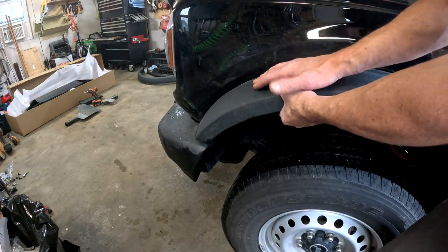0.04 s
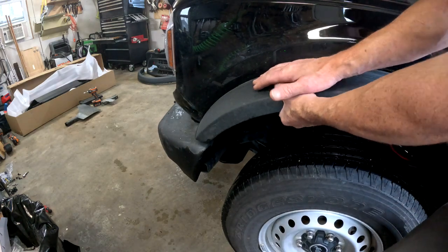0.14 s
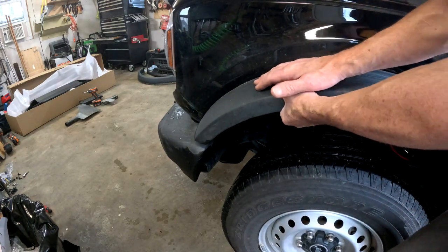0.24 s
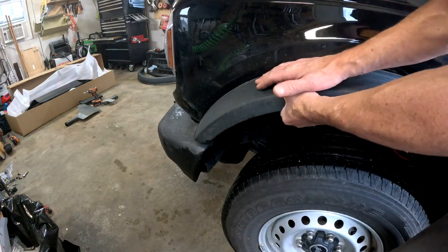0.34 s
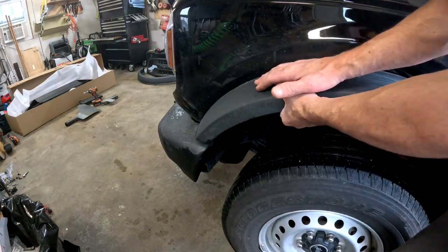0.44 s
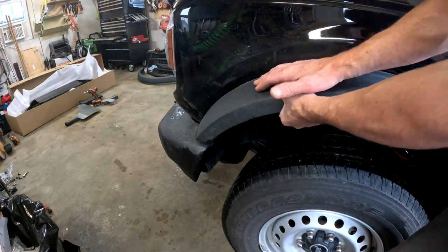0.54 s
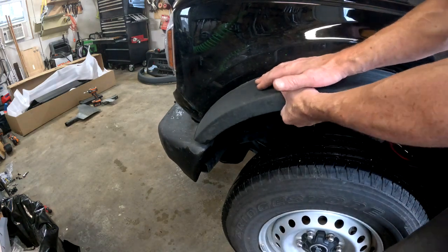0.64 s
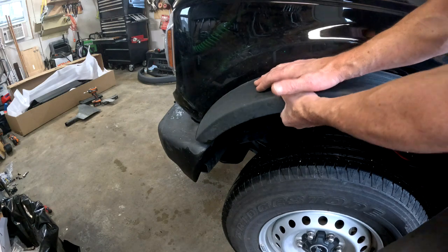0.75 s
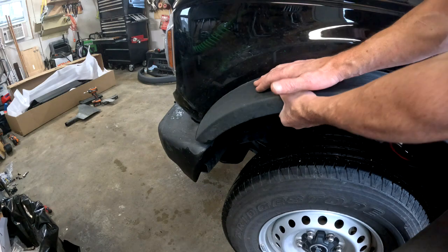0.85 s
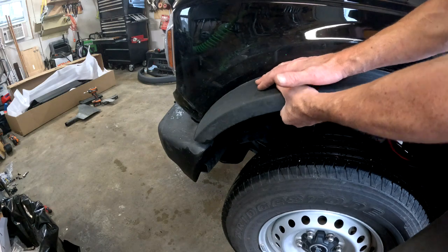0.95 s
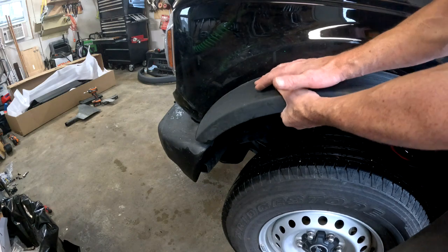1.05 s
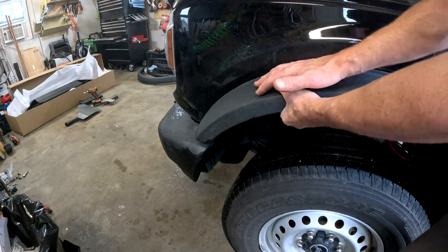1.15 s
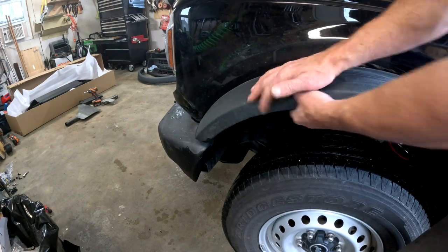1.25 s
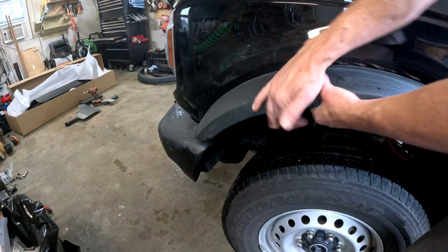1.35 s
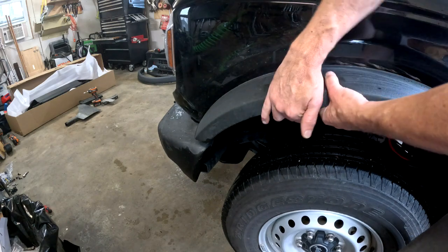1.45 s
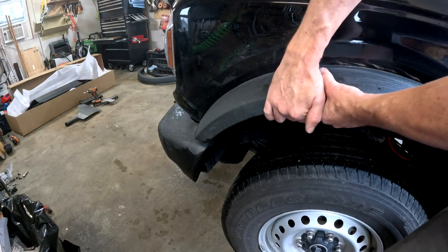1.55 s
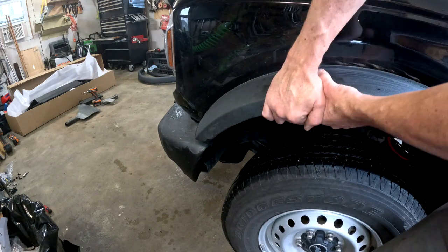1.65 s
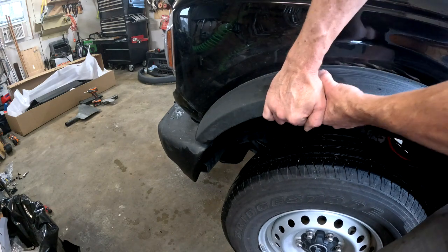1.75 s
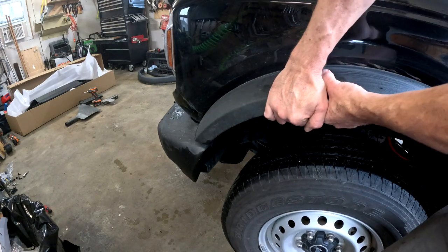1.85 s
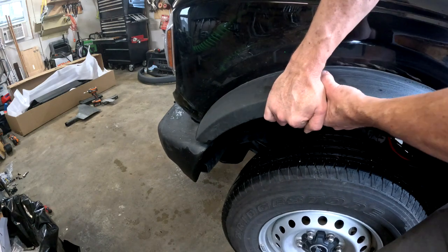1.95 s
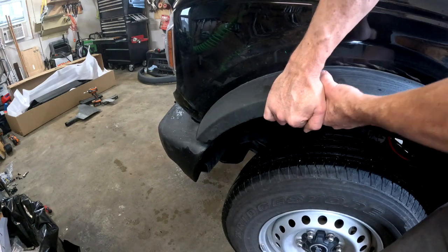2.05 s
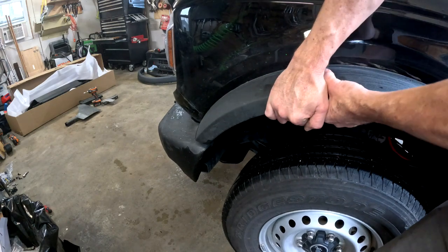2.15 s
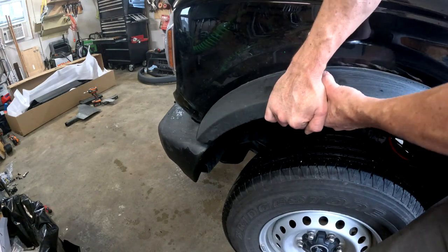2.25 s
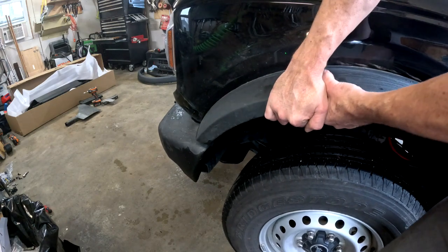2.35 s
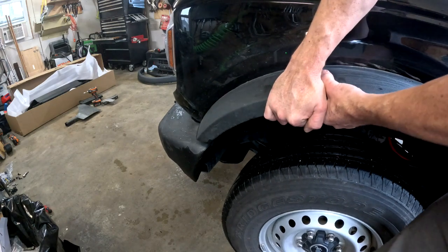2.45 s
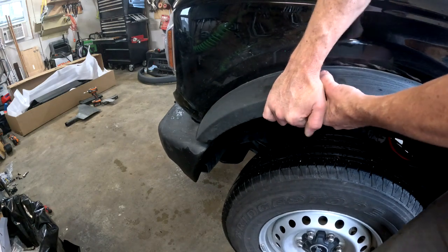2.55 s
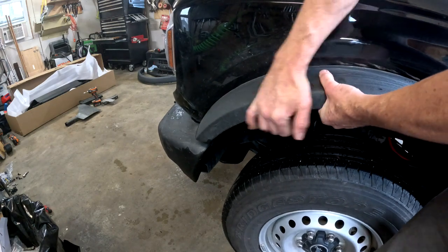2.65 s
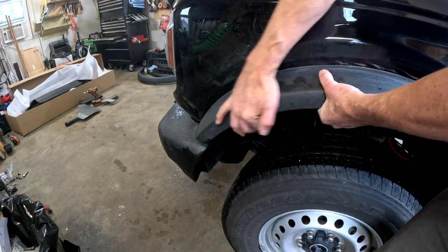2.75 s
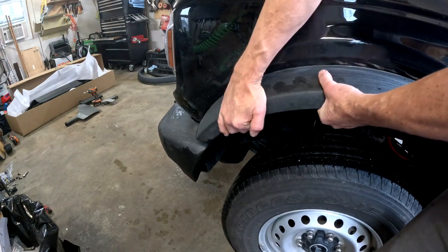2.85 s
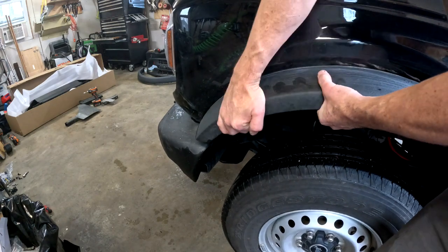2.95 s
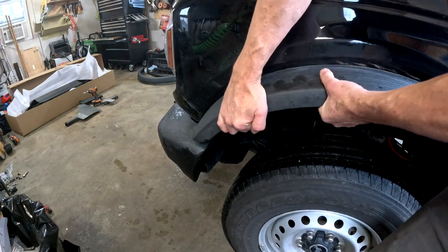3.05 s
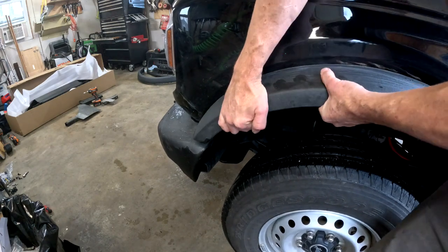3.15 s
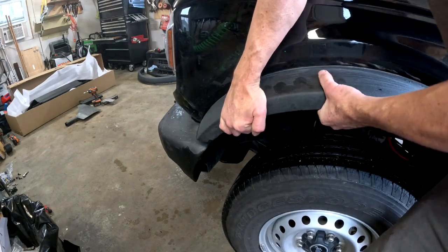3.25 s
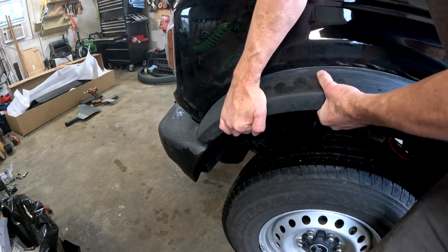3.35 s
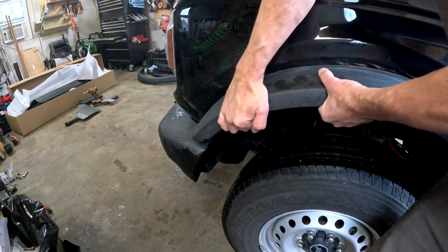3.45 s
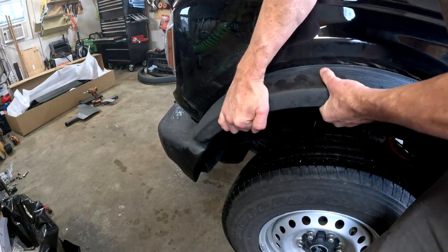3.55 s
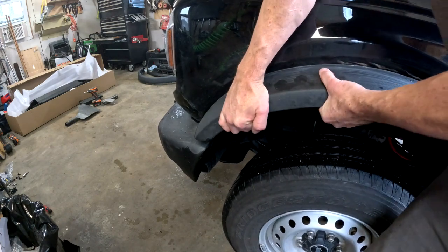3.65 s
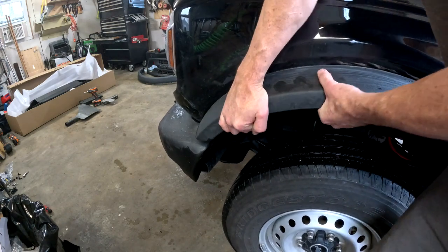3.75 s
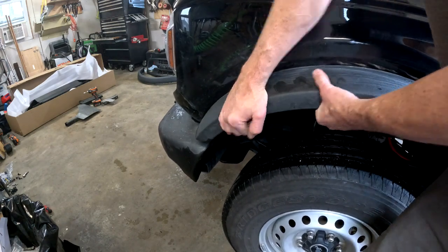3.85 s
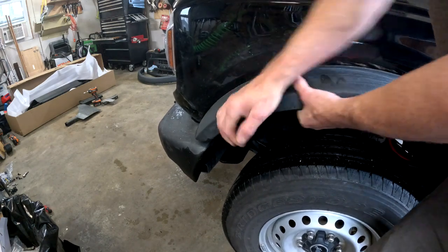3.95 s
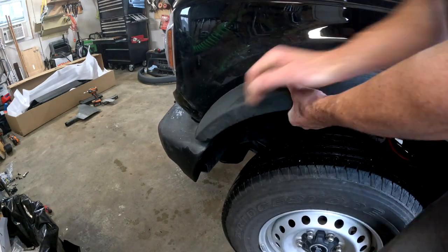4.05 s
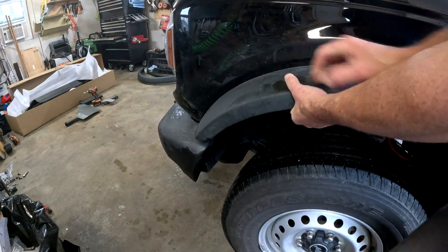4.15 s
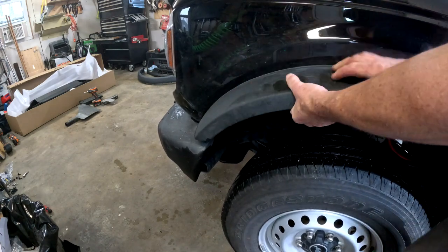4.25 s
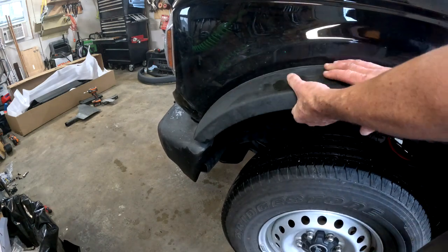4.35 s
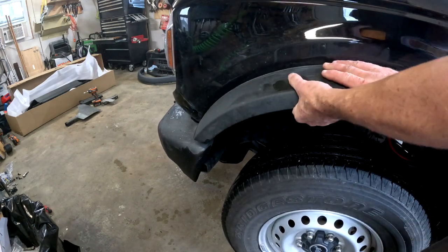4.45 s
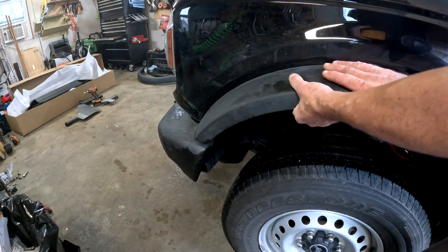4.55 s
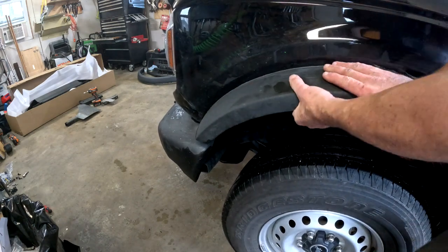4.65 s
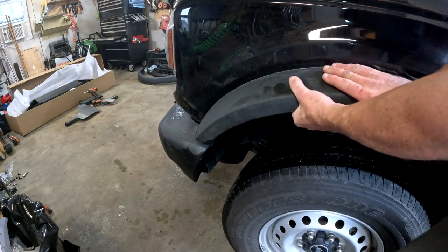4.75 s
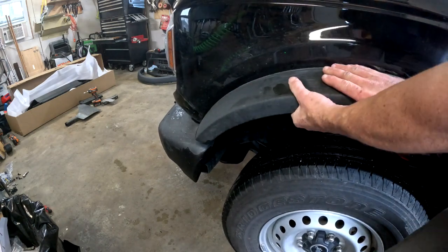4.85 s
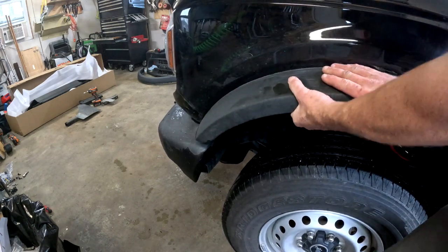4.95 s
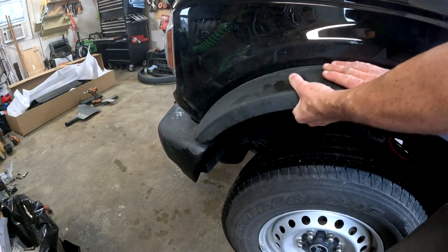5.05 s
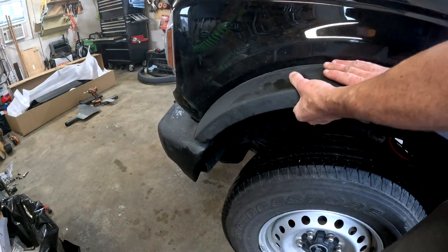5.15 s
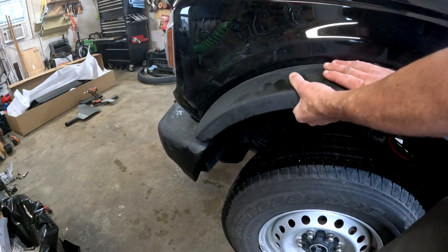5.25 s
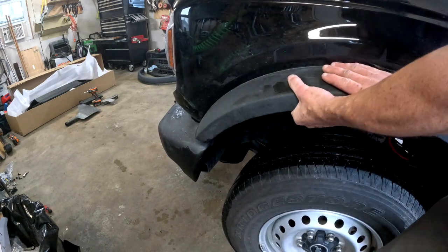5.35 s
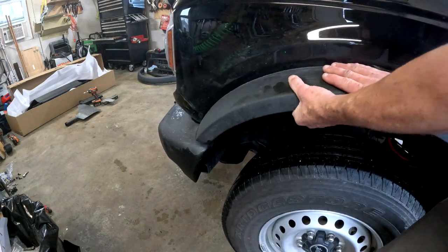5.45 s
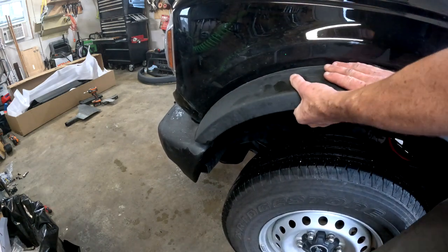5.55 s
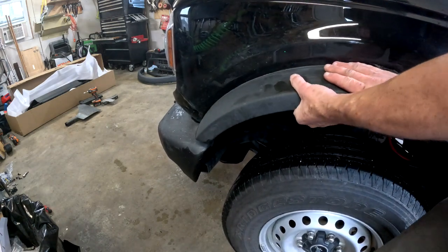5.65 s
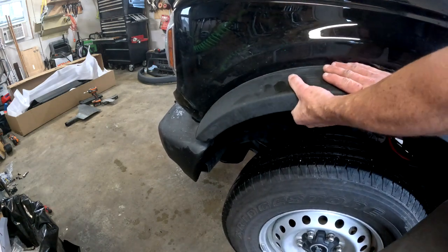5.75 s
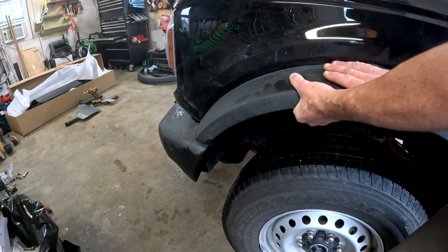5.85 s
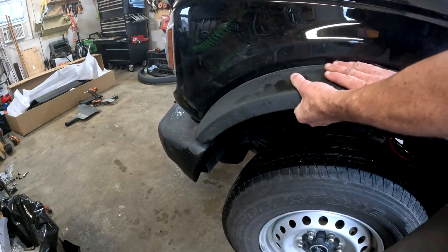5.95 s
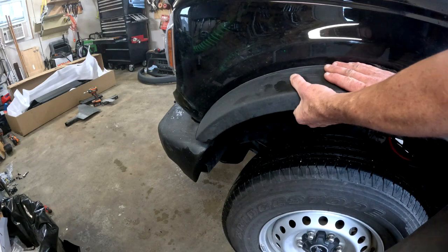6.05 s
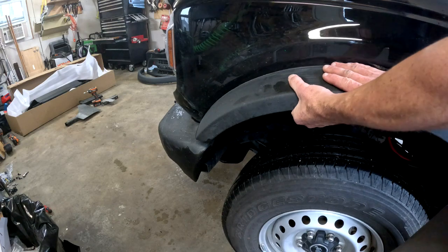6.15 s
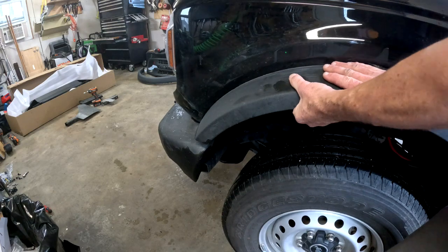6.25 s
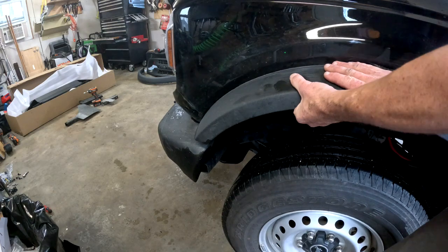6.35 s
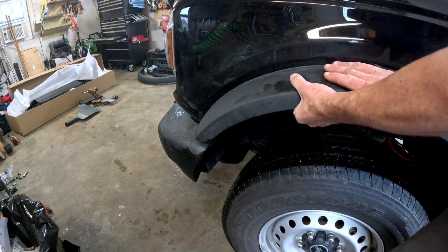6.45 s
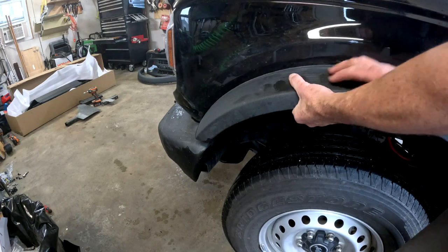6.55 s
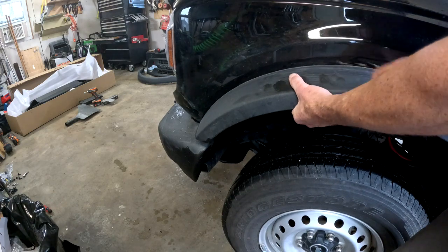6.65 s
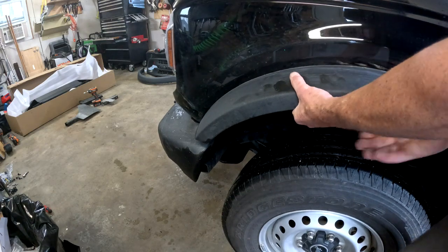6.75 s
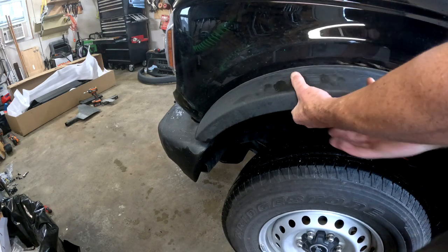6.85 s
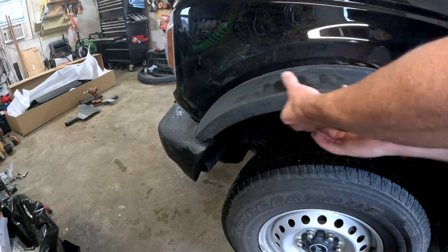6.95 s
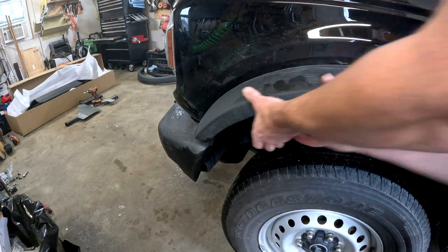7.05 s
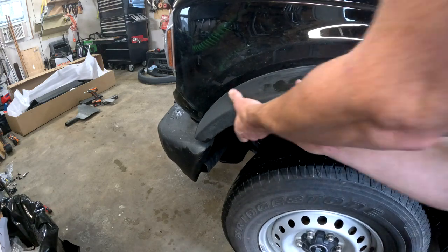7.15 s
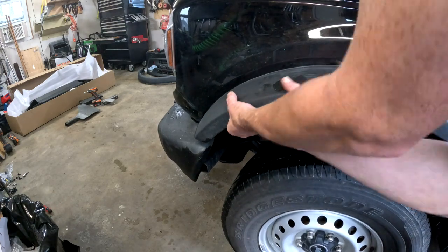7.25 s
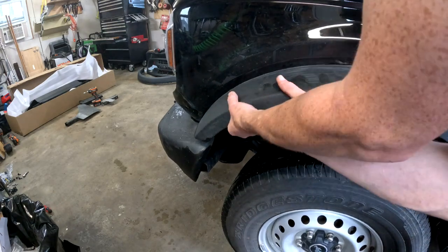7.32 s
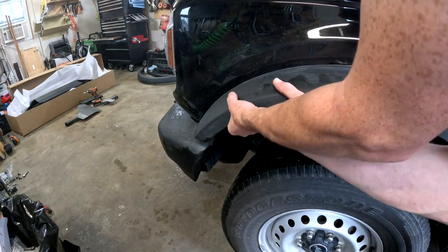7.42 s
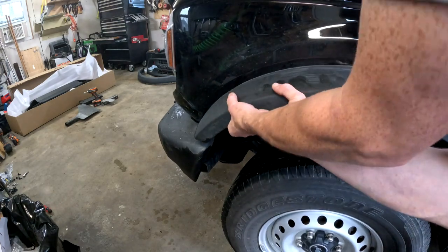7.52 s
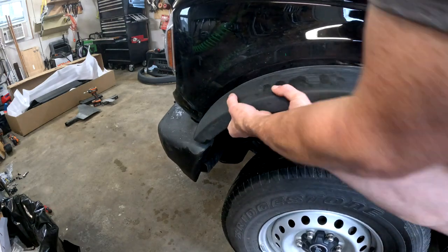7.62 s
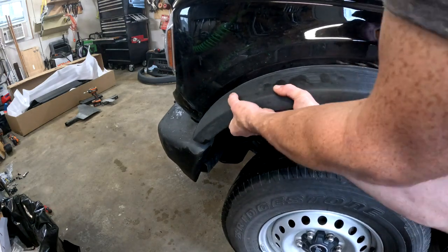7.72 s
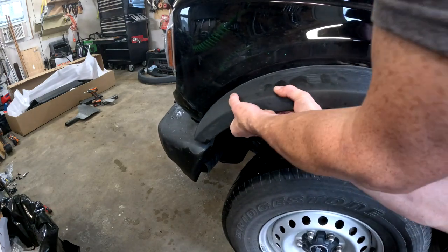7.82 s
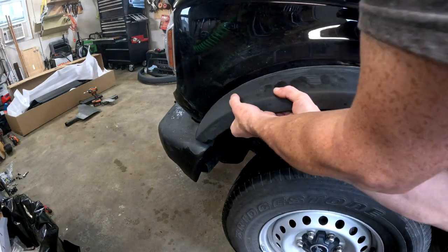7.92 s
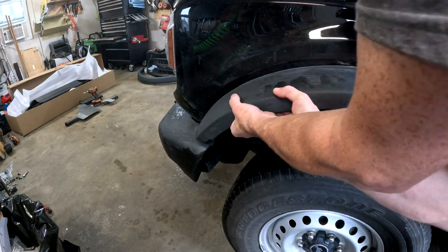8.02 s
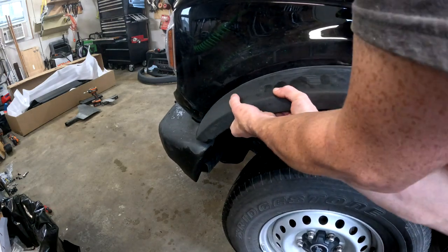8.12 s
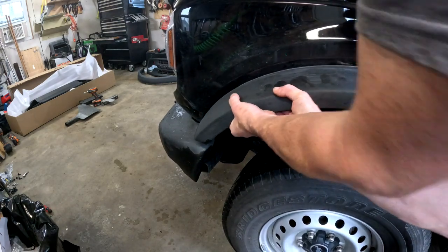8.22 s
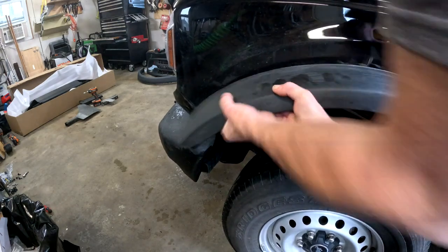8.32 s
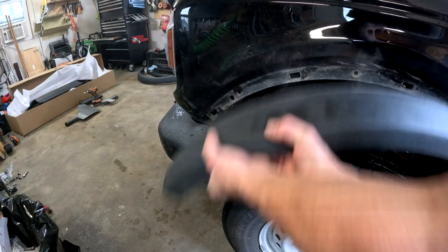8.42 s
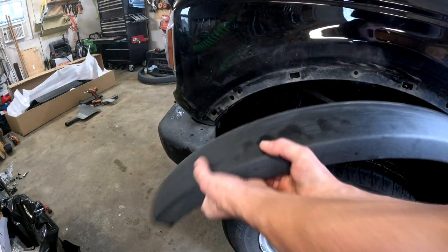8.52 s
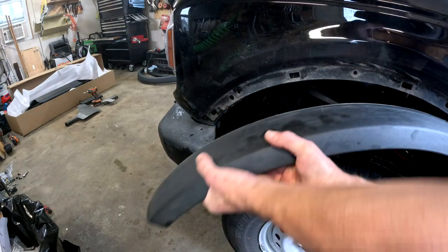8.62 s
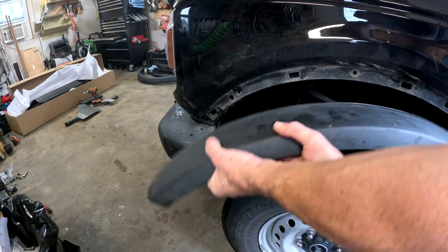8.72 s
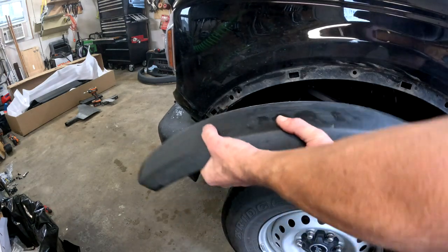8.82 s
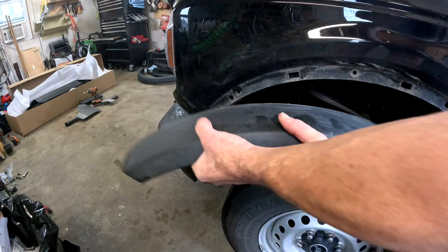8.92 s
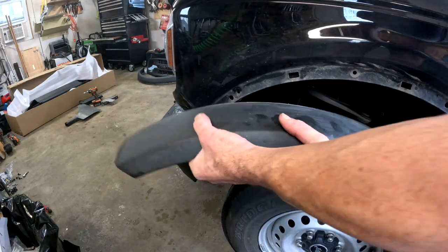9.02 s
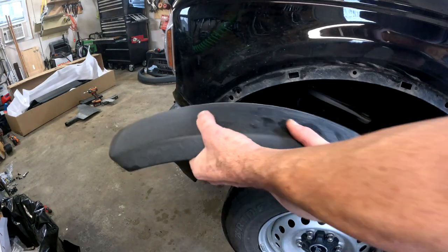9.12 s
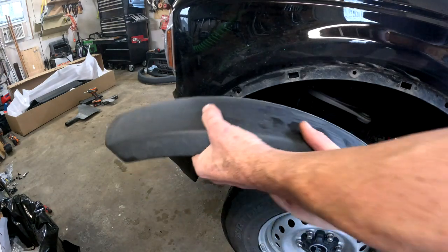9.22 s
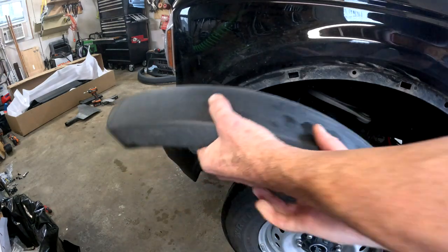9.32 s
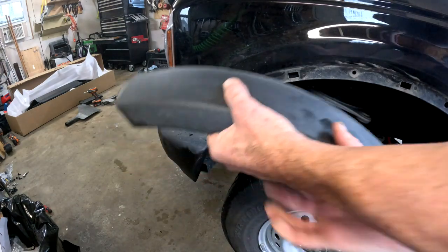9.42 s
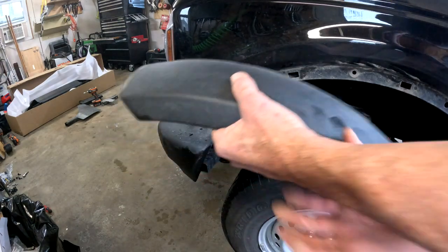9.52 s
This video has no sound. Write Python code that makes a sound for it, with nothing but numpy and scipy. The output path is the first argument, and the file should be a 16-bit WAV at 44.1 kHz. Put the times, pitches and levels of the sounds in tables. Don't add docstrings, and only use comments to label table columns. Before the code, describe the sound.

Sped-up plastic knocks, creaks and clip cracks from a car trim, a tiny silent gap, then a very loud snap, hollow thuds and fading hum.

```python
import sys
import numpy as np
from scipy import signal
from scipy.fft import rfft, irfft
from scipy.io import wavfile
from scipy.ndimage import uniform_filter1d

SR = 44100
rng = np.random.default_rng(int(sys.argv[2]) if len(sys.argv) > 2 else 0)


def decibels_to_gain(level_db):
    exponent = np.asarray(level_db, float) / 20
    return 10 ** exponent


def generate_wav(signal):
    frames = np.transpose(np.atleast_2d(signal))
    scaled = np.clip(frames, -1, 1) * 32767
    pcm = np.round(scaled).astype(np.int16)
    wavfile.write(sys.argv[1], SR, pcm)


N = 422478
CUT_START_S, CUT_END_S = 7.944, 7.962
RELEASE_S = 8.66

# hz, level_db_per_hz
SNAP_SPECTRA = [
    [(290, -31.5), (500, -5.5), (1140, -8), (1580, -12.5), (2390, -12.5), (7000, -23.5), (15000, -72.5)],
    [(410, -41), (700, -15), (1480, -11.5), (4470, -20.5), (7730, -39), (12000, -86.5), (15600, -118)],
]


def unit(x):
    return x / np.sqrt(np.mean(x ** 2) + 1e-20)


def along(points, hz):
    f, v = np.transpose(points)
    return np.interp(np.log(hz + 1), np.log(f + 1), v)


def causal(x, gain):
    m = 8192
    cepstrum = irfft(np.log(gain(np.fft.rfftfreq(m, 1 / SR)) + 1e-6), m)
    cepstrum[1:m // 2] *= 2
    cepstrum[m // 2 + 1:] = 0
    kernel = irfft(np.exp(rfft(cepstrum)), m)[:m // 2]
    kernel = kernel.reshape((1,) * (x.ndim - 1) + (-1,))
    return signal.oaconvolve(x, kernel, axes=-1)[..., :x.shape[-1]]


def ringing(modes, t):
    return sum(decibels_to_gain(db - 60 * t / t60_s) * np.sin(2 * np.pi * hz * t) for hz, db, t60_s in modes)


def grit(n, rate_hz, spread_db, share, patchy_db):
    slips = (rng.random((2, n)) < rate_hz / SR) * rng.choice([-1, 1], (2, n))
    size_db = spread_db * np.clip(rng.standard_normal((2, n)), -2, 2)
    slips = unit(slips * decibels_to_gain(size_db))
    share = np.clip(share, 0, 1)
    friction = np.sqrt(share) * slips + np.sqrt(1 - share) * rng.standard_normal((2, n))
    z = signal.stft(friction, nperseg=512)[2]
    patches = uniform_filter1d(rng.standard_normal(z.shape[1:]), size=8, axis=0)
    patches = uniform_filter1d(patches, size=4, axis=1)
    return signal.istft(z * decibels_to_gain(patchy_db * unit(patches)), nperseg=512)[1][:, :n]


def stereo(pair, spectrum):
    # hz, correlation
    likeness = [(60, 0.98), (250, 0.99), (600, 0.86), (2000, 0.54), (8000, .9), (13000, 0.79)]
    turn = lambda hz: np.arccos(np.clip(along(likeness, hz), 0, 1)) / 2
    mid = causal(pair[0], lambda hz: decibels_to_gain(along(spectrum, hz)) * np.cos(turn(hz)))
    side = causal(pair[1], lambda hz: decibels_to_gain(along(spectrum, hz)) * np.sin(turn(hz)))
    return unit(np.array([mid + side, mid - side]))


def garage(x):
    # hz, t60_s
    decay = [(200, 0.34), (2000, 0.24), (10000, 0.11)]
    hz, t, z = signal.stft(rng.standard_normal((2, SR // 2)), SR, nperseg=256)
    tail = signal.istft(z * decibels_to_gain(-60 * t / along(decay, hz)[:, None]), SR, nperseg=256)[1]
    delayed = np.pad(x, (200, 0))[None]
    return signal.fftconvolve(delayed, tail / np.linalg.norm(tail[0]), axes=1)[:, :N]


def sheet():
    # hz, level_db, t60_s
    body_modes = [(50.7, -39, 3), (157, -23, 0.59)]
    bracket_mode = (786, -54, 2.2)
    t = np.maximum(np.arange(N) / SR - RELEASE_S, 0)
    return ringing(body_modes + [bracket_mode], t) * (1 - np.exp(-t / 0.051))


def thumps():
    # start_s, peak_db, pitch_hz
    pushes = [(.881, -39, 137), (1.462, -29.5, 62), (1.849, -29, 130), (3.144, -35, 91), (3.323, -35, 116),
              (4.374, -39, 73), (4.801, -45, 78), (5.38, -35, 73), (5.575, -40, 62), (5.787, -36, 73),
              (6.32, -44, 65), (6.609, -46, 75), (6.818, -29.5, 85), (7.015, -35, 130), (7.13, -34, 90),
              (7.34, -31, 72), (7.892, -45, 67), (8.415, -26, 116), (8.458, -18, 112), (8.5, -20, 95)]
    decay_cycles, rise_s = 11, 0.005
    out, t = np.zeros(N + SR), np.arange(SR // 3) / SR
    for s, db, hz in pushes:
        swing = decibels_to_gain(db + 3 - 60 * t * hz / decay_cycles) * np.sin(2 * np.pi * hz * t)
        out[round(s * SR):][:len(t)] += swing * (1 - np.exp(-t / rise_s))
    return out[:N]


def ticks():
    # start_s, peak_db
    dirt_grains = [(0.197, -47), (0.3187, -41.5), (0.3436, -41), (1.1064, -49), (1.1276, -41), (1.1364, -44),
                   (1.1574, -51), (1.2012, -40), (1.2351, -42), (1.268, -38), (1.2965, -44), (1.5494, -51),
                   (1.6237, -47), (1.6826, -50), (1.7075, -43), (2.0163, -45), (2.0343, -38.5), (2.0582, -43),
                   (2.1647, -31), (2.2825, -36), (2.3414, -34), (2.5835, -40), (2.9786, -43), (3.286, -35.5),
                   (3.3149, -28), (3.5339, -37), (3.7728, -45), (3.9206, -30), (3.9719, -41), (4.5346, -38),
                   (4.6533, -47), (4.9082, -37), (5.3238, -44), (5.5129, -49), (5.5623, -44), (5.7227, -43),
                   (5.7892, -34.5), (5.9469, -36), (6.0703, -40), (6.353, -43), (6.4752, -48), (6.4903, -41),
                   (7.195, -40), (7.311, -37.5), (7.4689, -42), (7.9256, -40),
                   (1.7549, -52), (4.81, -56), (4.9804, -58), (5.8844, -58), (5.9165, -49), (6.3794, -61),
            (6.3994, -57), (6.4532, -58), (6.5156, -51), (6.5274, -52)]
    # hz, level_db_per_hz
    spectrum = [(1000, -28.5), (3000, 1), (7000, -4), (8600, -7), (10000, -3), (11200, -11), (14500, -26),
                (16000, -50)]
    grains = dirt_grains
    out, t = np.zeros((2, N + SR)), np.arange(SR // 50) / SR
    noise = rng.standard_normal((len(grains), 2, len(t)))
    noise = unit(causal(noise, lambda hz: decibels_to_gain(along(spectrum, hz))))
    for (s, db), pair in zip(grains, noise):
        tick = decibels_to_gain(db - 5.0 - 60 * t / 0.016) * (pair[0] + 0.45 * pair)
        out[:, round(s * SR):][:, :len(t)] += tick
    return out[:, :N]


def scrapes():
    # start_s, end_s, level_db, resonance_hz, width_hz
    strokes = [(.72, 0.775, -46, 1500, 450), (1.022, 1.085, -49, 1530, 350),
               (1.29, 1.385, -47.5, 2530, 1000), (1.285, 1.39, -45.5, 1180, 600),
               (1.39, 1.53, -46, 1340, 1100), (2.8, 2.89, -47, 2750, 570), (2.7, 2.722, -43, 1020, 300),
               (.035, .115, -49.5, 1340, 650), (.04, .15, -47.5, 490, 250), (7.3, 7.42, -53, 1140, 180),
               (7.04, 7.1, -51, 1110, 300), (2.675, 2.955, -51, 1200, 480), (3.935, 3.99, -38.5, 1090, 150),
               (3.977, 4.07, -49, 1720, 200), (6.63, 6.71, -49, 2710, 640)]
    out = np.zeros((2, N))
    for start, end, db, centre_hz, width_hz in strokes:
        n = round((end - start) * SR)
        resonance = lambda hz: 1 / (1 + (2 * (hz - centre_hz) / width_hz) ** 2)
        slips = grit(SR // 3, rate_hz=450, spread_db=4, share=0.3, patchy_db=1.5)
        tone = unit(causal(slips, resonance))[:, :n]
        swell = np.sin(np.pi * np.arange(n) / n) ** 0.39
        pair = tone[0] + 0.33 * tone[1] * np.array([[1], [-1]])
        out[:, round(start * SR):][:, :n] += decibels_to_gain(db) * swell * pair
    return out


def taps():
    # start_s, level_db
    touches = [
        (9.282, -44),
        (9.345, -58),
        (9.572, -56),
        (9.138, -60),
    ]
    # hz, level_db, t60_s
    trim_modes = [(614, -8, .07), (850, -14, .05), (960, -5, .06), (1066, 1, .06), (1235, 2, .06),
                  (1766, -10, 0.054), (2110, -14, .04), (3149, -11, .05), (4070, -13, .04)]
    rise_s = 0.006
    out, t = np.zeros(N + SR), np.arange(SR // 5) / SR
    hz, level_db, t60_s = np.transpose(trim_modes)[..., None]
    phases = rng.random((len(touches), len(trim_modes), 1))
    for (s, db), phase in zip(touches, phases):
        ring = decibels_to_gain(level_db - 60 * t / t60_s) * np.sin(2 * np.pi * (hz * t + phase))
        out[round(s * SR):][:len(t)] += decibels_to_gain(db + 8) * ring.sum(axis=0) * (1 - np.exp(-t / rise_s)) ** 2
    return out[:N]


def band_gains(t):
    # peak_s, flex_db, rub_db, rumble_db
    sharp_swells = [(.335, -41, -46, -39.5), (.56, -33, -49, -50), (.705, -32, -52, -40), (1.0, -32, -46, -45),
                    (1.285, -39.5, -60, -49), (1.468, -39, -46.5, -33), (1.858, -26, -42.5, -39),
                    (2.195, -30.5, -45.5, -37.5), (2.705, -46.5, -49, -50), (3.55, -29, -42.5, -32.5),
                    (3.95, -38.5, -45.5, -43.5), (4.35, -49, -50, -42.5), (4.852, -44, -44, -57),
                    (5.95, -40.5, -47, -40), (6.105, -41.5, -45, -56), (6.61, -47.5, -73, -52),
                    (6.835, -27, -45, -32), (7.045, -36.5, -44, -36.5), (9.29, -57, -58, -58.5)]
    # peak_s, flex_db, rub_db, rumble_db
    slow_swells = [(.1, -41.5, -52, -65), (.61, -38.5, -50.5, -43), (.87, -36.5, -51, -43), (1.13, -46, -54, -50),
                   (1.33, -58, -44.5, -50), (1.44, -60, -47, -60), (2.07, -36.5, -50.5, -52),
                   (2.335, -31.5, -45, -39), (2.47, -46.5, -56, -38.5), (2.85, -73, -42, -67),
                   (3.16, -34.5, -49, -38), (3.33, -31.5, -43, -41), (3.69, -40, -52.5, -45),
                   (3.82, -40.5, -47.5, -65), (4.05, -53.5, -43.5, -48.5), (4.47, -46, -50, -52),
                   (4.59, -48, -54.5, -63), (4.8, -45, -54, -47), (5.12, -35, -45.5, -42), (5.4, -35.5, -49, -45),
                   (5.61, -42, -50.5, -42), (5.8, -33, -42.5, -44), (6.235, -47, -56.5, -51),
                   (6.35, -49.5, -54, -44.5), (6.66, -54, -46.5, -48), (7.19, -42, -48.5, -38),
                   (7.37, -45.5, -49.5, -37.5), (7.75, -36.5, -44.5, -41), (7.92, -46, -60, -45)]
    # peak_s, flex_db, rub_db, rumble_db
    heaves = [
        (8.445, -25, -34.5, -25.5),
        (8.55, -21.5, -22.5, -30.5),
        (8.665, -22, -28, -29.5),
        (8.8, -54.5, -37, -42),
    ]
    # time_s, level_db
    resting_level = [(0, -58), (.5, -65), (.75, -58), (1.2, -61), (1.7, -58), (2.6, -58), (3.05, -60.5),
                     (3.7, -61.5), (4.2, -61.5), (4.7, -60.5), (5.0, -63), (6.0, -61.5), (6.8, -62), (7.25, -58),
                     (7.6, -63.5), (8.05, -59), (9.1, -60), (9.55, -65.5)]
    sharp_rise_db_s, slow_rise_db_s, heave_rise_db_s = (1140, 550, 740), (295, 156, 180), (330, 244, 350)
    let_go_db_s, heave_let_go_db_s = (199, 222, 125), (100, 124, 75)
    rest_db, rest_growth = np.array([-58, -58.5, -57]), np.array([1.6, 1.2, 0.8])
    loose_db = np.array([-8.5, -3.5, 1.5])

    steps = np.arange(0, N / SR + 0.01, 0.001)[:, None]
    raised_db = np.interp(steps, *np.transpose(resting_level)) + 60
    power = decibels_to_gain(2 * (rest_db + (steps > RELEASE_S) * loose_db + rest_growth * raised_db))
    for tugs, rise, fall in (
            (sharp_swells, sharp_rise_db_s, let_go_db_s),
            (slow_swells, slow_rise_db_s, let_go_db_s),
            (heaves, heave_rise_db_s, heave_let_go_db_s)):
        for s, *db in tugs:
            below_db = np.maximum((s - steps) * rise, (steps - s) * fall)
            power = power + decibels_to_gain(2 * (db - below_db))
    flex, rub, rumble = (np.interp(t, steps[:, 0], np.sqrt(p)) for p in power.T)
    return rumble, flex, rub


def handling():
    # hz, level_db_per_hz
    rumble_spectra = [
        [(12, -45), (20, -8), (48, 6.5), (107, -9.5), (120, -6), (160, -49.5), (260, -120)],
        [(12, -40.5), (20, -3.5), (54, -4), (68, -10.5), (81, -37), (120, -16), (160, -46), (260, -120)],
    ]
    flex_spectra = [
        [(53, -34.5), (90, -8), (108, -12.5), (263, -2.5), (435, -18.5), (480, -14), (620, -41), (1060, -120)],
        [(53, -45.5), (90, -9.5), (138, -0.5), (242, -18.5), (355, -12), (450, -19.5), (620, -51), (1060, -120)],
    ]
    creak_spectra = [
        [(240, -16.5), (400, -18), (539, -1.5), (841, -7), (1050, -6.5), (1360, -24.5), (2310, -120)],
        [(240, -37.5), (400, -24.5), (516, 0.5), (798, -6), (1050, -19.5), (1360, -32.5), (2310, -120)],
    ]
    rub_spectra = [
        [(530, -47), (900, -18), (1070, -4.5), (1310, -5), (4000, -12.5), (5200, -33), (8800, -120)],
        [(430, -30.5), (620, -5.5), (1340, -6), (2160, -6), (2870, -12), (4000, -20), (5200, -39), (8800, -120)],
    ]
    fizz_spectra = [
        [(2290, -45.5), (3900, 1.5), (5880, -2.5), (8270, -9.5), (10100, -10.5), (13900, -27), (15000, -50.5)],
        [(2290, -24), (3900, -5.5), (7150, -15.5), (8430, -29), (8970, -41), (12000, -69.5), (15600, -99)],
    ]
    # creak_db, fizz_db
    shares_db = [
        (-0.5, 1),
        (-2, -8.5),
    ]
    out = np.zeros((2, N))
    bounds = (0, round(CUT_END_S * SR), N)
    for part in range(2):
        first, last = bounds[part:part + 2]
        n = last - first
        rumble, flex, rub = band_gains(np.arange(first, last) / SR)
        creak_share, fizz_share = decibels_to_gain(shares_db[part])
        rub = np.minimum(rub, decibels_to_gain(-32.5))
        creak = creak_share * flex ** 0.93 * rub ** 0.24
        fizz = fizz_share * rub ** 1.104
        body = grit(n, rate_hz=60, spread_db=2, share=0.15, patchy_db=0.8)
        hollow = grit(n, rate_hz=120, spread_db=1, share=0.44, patchy_db=0.5)
        joint = grit(n, rate_hz=250, spread_db=2.5, share=0.46, patchy_db=1.0)
        skin = grit(n, rate_hz=500, spread_db=4.5, share=0.24, patchy_db=2.5)
        out[:, first:last] = (
            rumble * stereo(body, rumble_spectra[part])
            + flex * stereo(hollow, flex_spectra[part])
            + creak * stereo(joint, creak_spectra[part])
            + rub * stereo(skin, rub_spectra[part])
            + fizz * stereo(skin, fizz_spectra[part]))
    return out


def knocks():
    # start_s, peak_db, pitch_hz
    panel_hits = [(0.104, -26.5, 145), (0.327, -26.5, 215), (0.548, -25.5, 260), (0.687, -20, 210),
                  (0.986, -20.5, 225), (1.46, -30, 251), (1.853, -16, 260.5), (2.168, -30, 173),
                  (2.319, -22, 256), (3.139, -32.5, 190), (3.245, -29, 260), (3.313, -18.5, 274),
                  (3.531, -18, 250), (9.29, -50, 264), (3.965, -29, 239), (5.115, -25.5, 240),
                  (5.393, -23.5, 249), (5.777, -27.5, 228.5), (5.933, -36, 279), (6.101, -33.5, 277),
                  (1.888, -28.5, 175.5), (6.826, -15.5, 275), (8.491, -14, 145), (8.672, -19, 160),
                  (7.736, -26, 208), (7.902, -36, 262), (8.405, -26.5, 170), (8.532, -11.5, 144),
                  (8.581, -18, 133), (8.653, -8.5, 149), (8.536, -15, 330), (8.655, -19.5, 370),
                  (8.43, -27, 520), (8.74, -21, 145), (8.795, -26, 150), (.59, -28, 250), (.35, -33.5, 180),
                  (7.175, -33, 262), (7.045, -33, 303), (2.195, -33, 250), (5.14, -30, 260)]
    # start_s, peak_db, pitch_hz
    edge_pings = [(0.327, -45, 415), (0.554, -32, 530), (0.589, -33, 404), (0.726, -33, 570),
                  (0.856, -35, 401), (1.461, -38, 420), (1.854, -26, 703), (2.061, -32, 401),
                  (2.196, -36, 563), (2.321, -30, 458), (3.146, -35, 487), (3.26, -35, 479),
                  (3.314, -27, 492), (3.532, -32, 659), (3.667, -36, 490), (3.799, -38, 501),
                  (4.573, -42, 476), (5.109, -33, 552), (5.376, -32, 484), (5.746, -36, 495),
                  (6.825, -23, 484), (7.034, -30, 592), (7.071, -35, 708), (7.132, -35, 498),
                  (7.398, -41, 700)]
    punch, punch_cycles = 0.9, 1.3
    out, t = np.zeros(N + SR), np.arange(SR // 5) / SR
    jolts = panel_hits + [(s, db - 3, hz) for s, db, hz in edge_pings]
    luck = rng.standard_normal((len(jolts), 8))
    varies = np.array([0, 1, 1, 1])
    for (s, db, hz), chance in zip(jolts, luck):
        ratios = np.array([1, 0.72, 1.295, 2.1]) * (1 + 0.066 * chance[:4] * varies)
        levels_db = np.array([5.0, -6.5, -1.0, -5.0]) + 4.2 * chance[4:] * varies
        modes_hz = hz * ratios[:, None]
        decay = decibels_to_gain(levels_db[:, None] - 60 * t * modes_hz / 28)
        ring = (decay * np.sin(2 * np.pi * modes_hz * t)).sum(axis=0)
        onset = 1 - np.exp(-t / 0.0022)
        if s < CUT_START_S:
            onset = onset * (1 + punch * np.exp(-t * hz / punch_cycles))
        out[round(s * SR):][:len(t)] += decibels_to_gain(db - 6) * ring * onset
    return out[:N]


def cracks():
    # start_s, peak_db, centre_hz, brightness_db, tail_db
    splits = [(0.588, -26.5, 1060, -11, -1), (0.964, -28, 900, -6, -19), (1.235, -36, 1120, -5, -20),
              (1.268, -30.5, 1170, -11, -4), (1.848, -13.5, 1880, -13.5, 1.5), (2.164, -34, 5200, -1, -2),
              (2.318, -22.5, 920, -24, -12), (3.799, -30, 2370, -23, -22), (3.92, -36, 1040, 2, 0),
              (4.842, -17, 1430, -4.5, -4.5), (5.18, -37, 3770, -28, 5.5), (5.799, -22, 1070, -13, -5),
              (6.129, -29.5, 1720, -7.5, 7), (8.365, -40.5, 2900, -17, 6), (8.395, -31, 1770, -11, -13),
              (8.532, -22, 870, -13, 4), (8.652, -14.5, 900, -14, -3), (8.428, -25, 1800, -11, -6),
              (2.674, -37, 1700, -23, 2)]
    # start_s, peak_db, centre_hz, brightness_db
    rattles = [(0.327, -47, 1450, -8), (0.548, -30, 1350, -31), (0.686, -32, 805, -19),
               (2.698, -28.5, 1540, -26), (3.144, -35, 875, -12.5), (3.304, -25, 1200, -14.5),
               (3.529, -41, 975, 0), (3.937, -30, 1400, -22), (4.569, -36, 1110, -14),
               (5.104, -29, 1090, -9), (5.745, -32.5, 1110, -10), (6.094, -31.5, 1230, -12.5),
               (6.33, -44, 1260, -2), (6.49, -43.5, 1690, 5), (6.823, -19.5, 1320, -60),
               (7.033, -30.5, 1070, -9), (7.132, -34.5, 970, -12), (7.346, -37.5, 1220, -19),
               (8.486, -18, 1625, -13.5)]
    rattle_tail_db = 7.5
    spike_share = 0.6
    out, t = np.zeros((2, N + SR)), np.arange(SR // 5) / SR
    clips = [*splits, *([*row, rattle_tail_db] for row in rattles)]
    luck = rng.standard_normal((len(clips), 3, len(t)))
    impulse = -1.0 * (t == t[30])
    for (s, db, centre_hz, bright_db, tail_db), noise in zip(clips, luck):
        spectrum = SNAP_SPECTRA[int(s > CUT_END_S)]
        treble_db = lambda hz: (bright_db + 15.0) / (1 + (2600 / (hz + 1)) ** 4)
        peak = lambda hz: 0.7 + 1 / (1 + (np.log2((hz + 1) / centre_hz) / 0.38) ** 2)
        low_cut = lambda hz: 1 / (1 + (0.56 * centre_hz / (hz + 1)) ** 4)
        colour = lambda hz: decibels_to_gain(along(spectrum, hz) + treble_db(hz)) * peak(hz) * low_cut(hz)
        *tone, spike = causal(np.vstack([noise, impulse]), colour)
        tone = unit(np.array(tone))
        burst = tone[0] * decibels_to_gain(-60 * t / 0.042) * (1 - np.exp(-t / 0.0008)) ** 2
        tail = 0.64 * tone[0] + 0.47 * tone[1:]
        tail = tail * decibels_to_gain(tail_db - 14 - 60 * t / 0.29) * (1 - np.exp(-t / 0.0011))
        crack = burst / np.abs(burst).max() + spike_share * spike / np.abs(spike).max() + tail
        out[:, round((s - 0.0006) * SR):][:, :len(t)] += decibels_to_gain(db - 3.0) * crack
    return out[:, :N]


def last_clip():
    # hz, level_db, t60_s
    clip_modes = [(560, -15, 0.026), (855, -17, 0.018), (1430, 3, 0.013), (1700, 4, 0.011),
                  (2200, -3, 0.013), (2945, -6, 0.013), (3520, -13, .012), (3980, -8, 0.015),
                  (5130, -20, .012)]
    start_s, level_db, dull_hz = 8.4449, 2.3, 12500
    out, t = np.zeros((2, N)), np.arange(SR // 5) / SR
    ring = ringing(clip_modes, t)
    crack = causal(rng.standard_normal((2, len(t))), lambda hz: decibels_to_gain(along(SNAP_SPECTRA[1], hz)))
    crack = unit(crack) * decibels_to_gain(-11 - 60 * t / 0.026)
    sides = decibels_to_gain(level_db + np.array([[-0.7], [0.7]]))
    snap = sides * (ring + 0.6 * crack[0] + 0.4 * crack) * (1 - np.exp(-t / 0.0008)) ** 2
    snap = snap / (1 + np.abs(snap) ** 6) ** (1 / 6)
    snap = causal(snap, lambda hz: 1 / (1 + (hz / dull_hz) ** 8.5))
    out[:, round(start_s * SR):][:, :len(t)] = snap
    return out


def scene():
    jolts = knocks() + taps()
    background = decibels_to_gain(-34.5) * garage(jolts) + sheet() + thumps()
    hands = handling() + scrapes() + ticks()
    return background + hands + jolts + cracks() + last_clip()


def top_cut(x):
    return signal.sosfilt(signal.butter(12, 15670, fs=SR, output="sos"), x)


def record(dry):
    # hz, left_over_right_db
    ports = [(200, -.5), (3000, 0), (8000, -1), (13000, 3.5)]
    t = np.arange(N) / SR
    gate = np.clip(np.maximum(CUT_START_S - t, t - CUT_END_S) / 0.0061, 0, 1)
    left = causal(np.roll(dry[0], shift=1), lambda hz: decibels_to_gain(along(ports, hz) / 2))
    right = causal(dry[1], lambda hz: decibels_to_gain(-along(ports, hz) / 2))
    mix = np.clip(np.array([left, right]) * gate, -1, 1)
    return top_cut(mix)


dry = scene()
out = record(dry)
generate_wav(out)
```